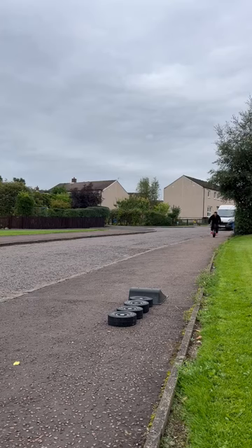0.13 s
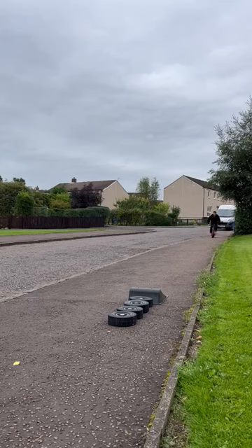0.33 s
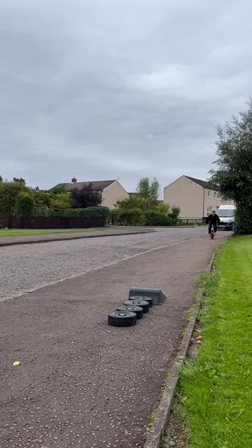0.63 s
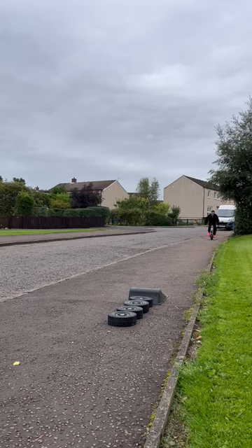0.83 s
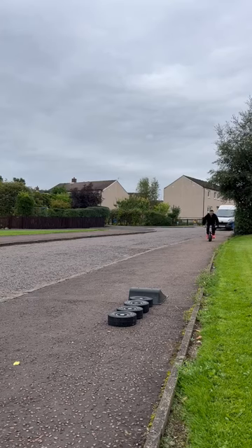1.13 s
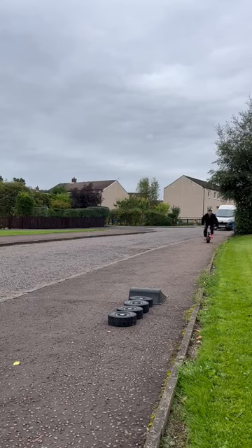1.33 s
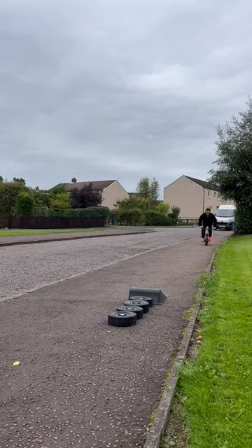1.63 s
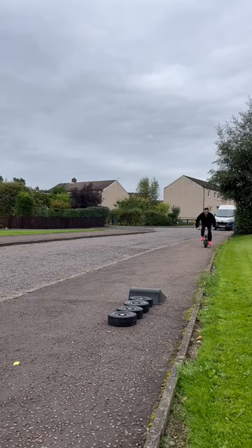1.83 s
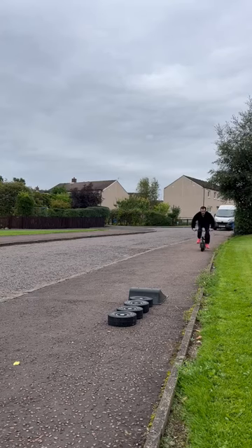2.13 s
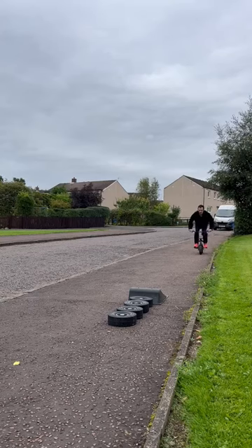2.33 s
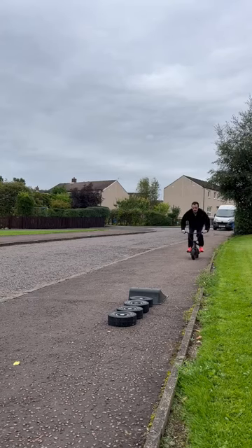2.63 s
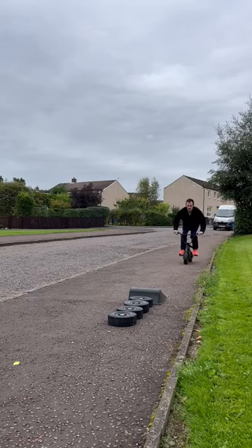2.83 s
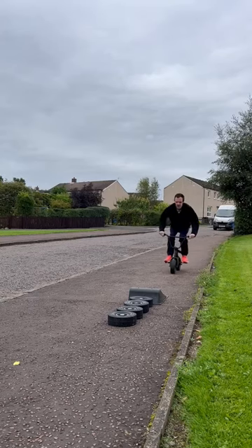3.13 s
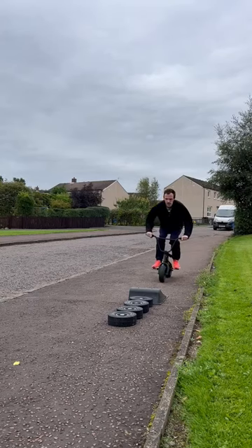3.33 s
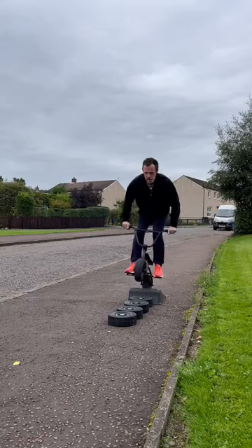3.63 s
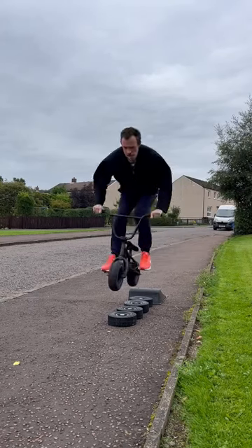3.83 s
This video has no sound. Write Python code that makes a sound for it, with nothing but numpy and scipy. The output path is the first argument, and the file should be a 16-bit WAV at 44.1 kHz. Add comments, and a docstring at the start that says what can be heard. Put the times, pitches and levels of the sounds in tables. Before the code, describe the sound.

Small bike wheels strike a hollow ramp in two quick knocks near the end, the second harder, after a faint gritty tyre approach; quiet open street, soft wind thumps on a nearby fixed microphone.

```python
"""On a quiet paved street, a small bike rolls closer and both wheels knock over a hollow wooden ramp.
Tyre hiss and grit ticks are shaped noise that grows, then drops at take-off. The knocks are ringing
board modes with noise cracks, a rattle and dull echoes. Light wind thumps the microphone as low noise
and short sagging tones. Far traffic, a far car and leaf rustle are shaped noise; birds are brief sines."""
import sys
import numpy as np
from scipy import signal
from scipy.fft import rfft, irfft
from scipy.io import wavfile
from scipy.ndimage import uniform_filter1d

SR = 44100
rng = np.random.default_rng(int(sys.argv[2]) if len(sys.argv) > 2 else 0)


def generate_wav(signal):
    """Clip the signal to [-1, 1] and save it as 16-bit WAV at the path in sys.argv[1]."""
    frames = np.transpose(np.atleast_2d(signal))
    scaled = np.clip(frames, -1, 1) * 32767
    pcm = np.round(scaled).astype(np.int16)
    wavfile.write(sys.argv[1], SR, pcm)


N = 176400

# Far traffic colour: pitch_hz, level_db (relative, per Hz)
STREET_COLOUR = [(18, -30), (30, -1), (204, -2.5), (291, -11), (686, -28), (1000, -13.5), (2750, -40),
                 (4670, -35.5), (5720, -39), (7550, -63), (8780, -71), (9710, -90), (12500, -48)]
# Far traffic leaning left: pitch_hz, left_over_right_db
STREET_LEAN = [(600, 0.5), (1030, 7.5), (1700, 1.5)]
# Far car colour: pitch_hz, level_db (relative, per Hz)
CAR_COLOUR = [(200, -6), (300, -12), (520, -4), (750, -11.5), (900, -12)]
# Far car loudness over time: time_s, level_db
CAR_LEVEL = [(.04, -65), (.7, -58), (1.5, -54.5), (2.2, -60), (4.0, -65.5)]
# Leaf rustle colour, with a narrow gap near 6 kHz from audio coding: pitch_hz, level_db (relative, per Hz)
CODED_RUSTLE_COLOUR = [(2000, -5.5), (2600, -4), (3400, -4.5), (5000, -6), (5500, 1.5), (5800, -19),
                       (6600, -75), (6900, -8.5), (8200, -7), (9300, -11.5), (10000, -19), (12500, -21)]
# Leaf rustle loudness over time: time_s, level_db
RUSTLE_LEVEL = [(.04, -75.5), (.5, -69.5), (1.9, -64.5), (3.1, -67), (3.5, -61), (3.7, -56.5), (3.9, -54),
                (4.0, -61.5)]
# Bird chirps: start_s, length_s, start_pitch_hz, level_db, left_over_right_db
CHIRPS = [(.355, .035, 5110, -62, 0), (1.052, .016, 1050, -53, 10), (1.24, .04, 5200, -63, 0),
          (2.321, .033, 5090, -62, 0), (3.893, .032, 8030, -58, 0), (3.98, .018, 4200, -60, 0)]
# Wind colour: pitch_hz, level_db (relative, per Hz)
WIND_COLOUR = [(20, -24), (35, -2), (55, 19), (80, 3), (120, -7), (200, -34), (300, -12)]
# Gust thumps: peak_s, level_db, width_s, pitch_hz (at the peak)
GUSTS = [(0.134, -33.5, 0.0088, 83), (0.207, -42, 0.019, 48.6), (0.552, -41, 0.035, 59.6),
         (0.619, -35, 0.017, 97), (1.052, -39.5, .015, 76.4), (1.199, -40, 0.052, 51),
         (1.46, -42, 0.041, 83.7), (1.766, -31.5, 0.0067, 64.5), (2.497, -37, 0.016, 86),
         (2.642, -43, 0.03, 58), (2.734, -27, 0.025, 67.5), (2.851, -43, 0.039, 59),
         (3.35, -50.5, 0.072, 66.5)]
# Tyre colour: pitch_hz, level_db (relative, per Hz)
TYRE_COLOUR = [(88, -66), (150, -6.5), (228, -4), (300, 2.5), (551, -5), (944, -12.5), (1460, -7.5),
               (3070, -17.5), (6480, -46), (9500, -33.5), (12400, -47.5)]
# Tyre loudness before lift-off is applied: time_s, level_db
TYRE_LEVEL = [(.04, -71), (.6, -66.5), (1.2, -62.5), (1.8, -58), (2.3, -56), (2.8, -54), (3.2, -53),
              (3.5, -50)]
# Larger stones: start_s, drive_db (before the tyre colour)
STONES = [(1.8781, -38), (2.012, -38.5), (2.774, -37), (3.1683, -45), (3.1803, -37), (3.189, -29),
          (3.2, -39), (3.277, -36), (3.319, -35.5), (3.333, -42)]
# Ringing modes of the ramp: pitch_hz, level_db (relative), t60_s
RAMP_MODES = [(107, -33, .07), (154.8, 0, 0.061), (200, -6.5, 0.063), (280.4, -0.5, 0.0296),
              (350, -8.5, 0.021), (535.5, -6, 0.054), (712, -13.5, 0.068), (834, -1, 0.028),
              (939, 1, 0.018), (1124, -14.5, 0.088), (1206, -2.5, 0.025), (1540, -8.5, 0.027),
              (1760, -13, 0.02), (2890, -6, 0.0094), (3304, -1.5, 0.0061)]
# Blows on the ramp: start_s, force_db, contact_ms, direction (sign), crack_db
BLOWS = [(3.5445, -29, 0.12, 1, -29), (3.548, -26, 0.3, -1, -29), (3.5544, -15, 0.6, -1, -9.5),
         (3.557, -25, 0.91, 1, -23), (3.5595, -14.5, 1.13, -1, -16), (3.566, -27.5, 2.2, -1, -50),
         (3.5737, -8.5, 3.47, -1, -35), (3.599, -34, 0.44, 1, -46), (3.613, -20.5, 3.1, 1, -50),
         (3.6365, -25, 0.14, 1, -24.5), (3.647, -11, 0.83, -1, -21), (3.65, -8, 2.1, -1, -40),
         (3.6546, -8.5, 0.082, 1, -19.5), (3.658, -13.5, 0.71, -1, -28), (3.66, -14.5, 1.15, -1, -25),
         (3.661, -16, 0.97, 1, -7), (3.665, -14.5, 1.1, -1, -39), (3.6675, 1, 2.39, -1, -46),
         (3.733, -37, 3, 1, -48), (3.762, -32.5, 1.67, -1, -47), (3.796, -27, 2.35, -1, -55),
         (3.825, -32, 4.8, 1, -63), (3.877, -67, 0.35, 1, -32.5)]
# Wheels rolling over the boards: time_s, level_db
RATTLE_LEVEL = [(3.534, -63), (3.553, -32), (3.57, -50.5), (3.635, -40), (3.655, -26.5), (3.69, -58)]
# Left-right likeness of far sounds: pitch_hz, likeness (0 to 1)
FAR_LIKENESS = [(80, 0.87), (400, 1), (700, 0), (1200, 0.56), (4400, 0.08), (5500, 0.94), (7000, 0.03),
                (9100, 1), (10300, 0.54)]
# Left-right likeness of tyres and far car: pitch_hz, likeness (0 to 1)
NEAR_LIKENESS = [(350, 0.97), (600, 0.41), (950, 0.073), (1250, 1), (2000, 1), (2300, 0.29), (2750, 0.94),
                 (3100, 0.98), (4400, 0.19), (9000, 0.95)]
# Microphone pair, left against right: pitch_hz, lead_rad, left_over_right_db
MIC_PAIR = [(150, 0, 0), (300, -.3, 0), (550, -.8, 0), (900, -.7, -1), (1500, 0, 0), (2250, .9, 0),
            (2500, 2.3, 2), (2750, 1.1, 3), (3100, .1, 0), (4000, .6, -2.5), (4500, 2.2, -3),
            (5000, 1.3, 0), (5500, 3, 2), (7000, 5.5, 0), (8400, 6.3, 0), (9100, 8, -1), (10300, 9.4, 0),
            (11200, 10, 0)]

STREET_DB, WIND_DB, WIND_LIKENESS = -51, -53, 0.83
GUST_SAG, GUST_LEAN_DB, GUST_EDGE = 0.39, 2, 0.27  # pitch sag (fraction), lean (dB), octave level
ECHO_DB, ECHO_T60_S, ECHO_RISE_S, ECHO_DULL_HZ = -33, 0.67, 0.007, 590
TAKE_OFF_S, LIFT_S, AIRBORNE_DB = 3.6, 0.0068, -13
GRIT_PER_S, GRIT_SPREAD_DB, GRIT_DB, GRIT_T60_S = 600, 3, -2, 0.005
SPREAD_S = 0.00048  # a blow takes this long to spread through the boards
CRACK_HZ, CRACK_WIDE = 1330, 0.89  # top of the crack for a 1 ms contact; stereo share
CRACK_SNAP_T60_S, CRACK_T60_S, CRACK_TAIL_DB = 0.0074, 0.073, -7
BOX_LOW_HZ = 82
START_S, LOW_CUT_HZ, EDGE_HZ = 0.036, 43.5, 12100


def amp(db):
    """Decibels to linear gain."""
    return 10 ** (np.asarray(db) / 20)


def evened(x):
    """Bring a signal to unit RMS."""
    return x / np.sqrt(np.mean(x ** 2) + 1e-20)


def read(points, hz):
    """Read a pitch curve on a logarithmic frequency axis."""
    f, value = np.transpose(points)
    return np.interp(np.log(hz + 1), np.log(f + 1), value, value[0], value[-1])


def curve(points):
    """Draw straight lines through time points, one value per sample."""
    return np.interp(np.arange(N) / SR, *np.transpose(points))


def add(mix, s, sound):
    """Lay a sound into the mix at s seconds, trimmed to fit."""
    part = mix[..., round(s * SR):][..., :sound.shape[-1]]
    part += sound[..., :part.shape[-1]]


def noise(spectrum, likeness, patchy_db, flicker_db):
    """Unit-RMS stereo noise from random short-time spectra with patches and a shared flicker."""
    frames, hz = N // 256 + 5, np.fft.rfftfreq(1024, 1 / SR)
    a, b, c, d, patches = rng.standard_normal((frames, 513, 5)).T
    patches = uniform_filter1d(patches, size=12, axis=0)  # across pitch
    patches = evened(uniform_filter1d(patches, size=10, axis=1))  # across time
    flicker = evened(uniform_filter1d(rng.standard_normal(frames), size=5))

    same = np.clip(read(likeness, hz), -1, 1)[:, None]
    left = a + 1j * b
    right = same * left + np.sqrt(1 - same ** 2) * (c + 1j * d)
    inside = (hz >= spectrum[0][0]) & (hz <= spectrum[-1][0])
    level_db = read(spectrum, hz)[:, None] + patchy_db * patches + flicker_db * flicker
    z = np.array([left, right]) * amp(level_db) * inside[:, None]
    return evened(signal.istft(z, nperseg=1024, noverlap=768)[1][:, :N])


def far_traffic():
    """Far traffic blurs into a steady noise bed that leans left."""
    bed = amp(STREET_DB) * noise(STREET_COLOUR, FAR_LIKENESS, patchy_db=1.1, flicker_db=0.6)
    lean = amp(read(STREET_LEAN, np.fft.rfftfreq(N, 1 / SR)) / 2)
    return irfft(rfft(bed) * np.array([lean, 1 / lean]), N)


def far_car():
    """A far car is a low noise band that swells and fades."""
    return amp(curve(CAR_LEVEL)) * noise(CAR_COLOUR, NEAR_LIKENESS, patchy_db=0.8, flicker_db=0.4)


def leaves():
    """Leaf rustle is high noise, patchy in pitch and flickering in level."""
    rustle = noise(CODED_RUSTLE_COLOUR, FAR_LIKENESS, patchy_db=2.5, flicker_db=2.9)
    return amp(curve(RUSTLE_LEVEL)) * rustle


def birds():
    """Each chirp is a short sine whistle with a slight fall in pitch and a wavering level."""
    out = np.zeros((2, N))
    for s, length, hz, db, pan_db in CHIRPS:
        t = np.arange(0, length, 1 / SR)
        tone = np.sin(2 * np.pi * hz * t * (1 - 0.2 * t))
        tone *= np.sin(np.pi * t / length) ** 0.5  # swell and fade
        tone *= 1 + 0.3 * evened(uniform_filter1d(rng.standard_normal(len(t)), size=300))
        add(out, s, amp(db + np.array([[pan_db], [-pan_db]]) / 2) * tone)
    return out


def wind():
    """Wind puts low lumpy pressure on the ports; each gust is a short thump that sags in pitch."""
    likeness = [(20, WIND_LIKENESS), (300, WIND_LIKENESS)]
    out = amp(WIND_DB) * noise(WIND_COLOUR, likeness, patchy_db=-3.0, flicker_db=-2.0)
    side = np.array([[1], [-1]])  # left, right
    variations = rng.uniform(-0.58, 1, (len(GUSTS), 3))
    for (s, db, width, hz), (turn, skew, lean) in zip(GUSTS, variations):
        u = np.arange(-3 * width, 3 * width, 1 / SR)
        sagging = u - GUST_SAG * width * np.log(np.cosh(u / width))
        phase = 2 * np.pi * hz * sagging + np.pi * turn
        thump = np.sin(phase + 0.88 * skew * side) + GUST_EDGE * np.sin(2 * phase + turn)
        swell = np.exp(-(u / width) ** 2)
        add(out, s - 3 * width, amp(db + GUST_LEAN_DB * lean * side) * swell * thump)
    return out


def echoes(x):
    """Road, hedge and house fronts scatter the sound back as sparse, dull, decaying reflections."""
    t = np.arange(SR // 2) / SR
    taps = rng.standard_normal((2, len(t))) * (rng.random((2, len(t))) < 0.05)
    taps *= amp(-60 * t / ECHO_T60_S) * np.minimum(t / ECHO_RISE_S, 1)
    taps = 3.2 * taps[:1] + 0.074 * taps  # nearly mono
    taps = signal.lfilter(*signal.butter(2, ECHO_DULL_HZ, fs=SR), taps)
    return amp(ECHO_DB) * signal.fftconvolve(x, taps / np.linalg.norm(taps[0]), axes=1)[:, :N]


def tyres():
    """Rolling tyres hiss and tick over grit until take-off lowers both; larger stones click."""
    t = np.arange(600) / SR
    hz = np.fft.rfftfreq(N, 1 / SR)
    sizes_db = GRIT_SPREAD_DB * np.minimum(rng.exponential(1, N), 2.5)
    clicks = amp(sizes_db) * (rng.random(N) < GRIT_PER_S / SR)
    grit = signal.oaconvolve(clicks, amp(-60 * t / GRIT_T60_S))[:N] * rng.standard_normal(N)
    grit = evened(irfft(rfft(grit) * amp(read(TYRE_COLOUR, hz)) * (hz > 500), N))

    hiss = noise(TYRE_COLOUR, NEAR_LIKENESS, patchy_db=0.0, flicker_db=0.5)
    # a smooth step from 0 on the ground to 1 in the air
    lift = 1 / (1 + np.exp(np.clip((TAKE_OFF_S - np.arange(N) / SR) / LIFT_S, -50, 50)))
    rolling = amp(curve(TYRE_LEVEL) + AIRBORNE_DB * lift) * (hiss + amp(GRIT_DB) * grit)

    stones = np.zeros(N)
    for s, drive_db in STONES:
        add(stones, s, amp(drive_db - 60 * t / 0.01) * rng.standard_normal(600))
    stone_colour = amp(0.75 * read(TYRE_COLOUR, hz) + 14.5) * (hz > 700)
    return rolling + irfft(rfft(stones) * stone_colour, N)


def ramp_crack(t, contact_ms, crack_db):
    """A dry crack is grainy noise, brighter for short contacts, with a fast snap and a longer tail."""
    top_hz = np.clip(CRACK_HZ / contact_ms ** 0.59, 300, 11000)
    band = signal.butter(2, [0.13 * top_hz, top_hz], "bandpass", fs=SR)
    crack = signal.lfilter(*band, rng.standard_normal((3, len(t))))
    crack = crack[:1] + CRACK_WIDE * crack[1:]  # shared centre plus separate sides
    grain = np.sqrt(rng.exponential(1, len(t) // 40 + 1)).repeat(40)[:len(t)]
    snap, tail = amp(-60 * t / CRACK_SNAP_T60_S), amp(CRACK_TAIL_DB - 60 * t / CRACK_T60_S)
    fade = amp(crack_db) * (snap + tail) * np.minimum(t / 0.0011, 1)
    return crack * uniform_filter1d(grain, size=16) * fade


def ramp():
    """Short blows wake the high board modes, long ones the hollow box; rolling wheels rattle the boards."""
    t, out = np.arange(SR // 4) / SR, np.zeros((2, N))
    hz, db, t60 = np.transpose(RAMP_MODES)[:, :, None]
    ring = amp(db - 60 * t / t60) * np.sin(2 * np.pi * hz * t) * (1 - np.exp(-t / SPREAD_S))
    for s, force_db, contact_ms, direction, crack_db in BLOWS:
        push = np.hanning(max(round(contact_ms * SR / 1000), 3) + 2)
        seated = 1 - np.exp(-(hz * contact_ms / 250) ** 2)  # brief contacts hardly move low modes
        knock = np.convolve((seated * ring).sum(0), push / push.sum())[:len(t)]
        crack = ramp_crack(t, contact_ms, crack_db)
        add(out, s, amp(force_db) * np.sign(direction) * knock + crack)

    boards = ring[hz[:, 0] > 500].sum(0)[None]
    rolling = signal.oaconvolve(rng.standard_normal((2, N)), boards, axes=1)[:, :N]
    rattle = evened(2 * rolling[:1] + 0.5 * rolling)
    t = np.arange(N) / SR
    on_boards = (t > RATTLE_LEVEL[0][0]) & (t < RATTLE_LEVEL[-1][0])
    out = out + amp(curve(RATTLE_LEVEL)) * rattle * on_boards
    return signal.sosfiltfilt(signal.butter(2, BOX_LOW_HZ, "highpass", fs=SR, output="sos"), out)


def ports(x):
    """Two microphone ports hear the scene with a phase and level difference that depends on pitch."""
    hz = np.fft.rfftfreq(N, 1 / SR)
    at, lead, tilt_db = np.transpose(MIC_PAIR)
    half = amp(np.interp(hz, at, tilt_db) / 2) * np.exp(0.5j * np.interp(hz, at, lead))
    return irfft(rfft(x) * np.array([half, 1 / half]), N)


def scene():
    """Street, tyres and ramp pass through the ports; wind and birds are added directly."""
    far = far_traffic() + far_car() + leaves()
    knocks = ramp()
    return ports(far + echoes(knocks) + tyres() + knocks) + birds() + wind()


def record(dry):
    """Sound begins after a short silence; the microphone cuts deep bass; then the band limit."""
    on = np.arange(N) >= START_S * SR
    thin = signal.lfilter(*signal.butter(2, LOW_CUT_HZ, "highpass", fs=SR), dry * on)
    band_limit = signal.firwin(511, EDGE_HZ, window=("kaiser", 9), fs=SR)
    return signal.oaconvolve(thin, band_limit[None], "same")


dry = scene()
out = record(dry)
generate_wav(out)
```